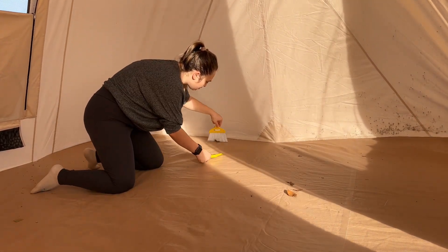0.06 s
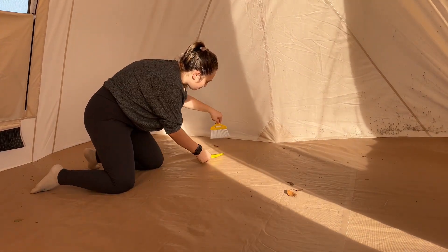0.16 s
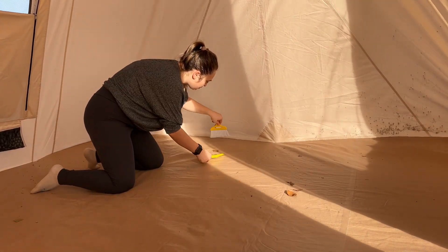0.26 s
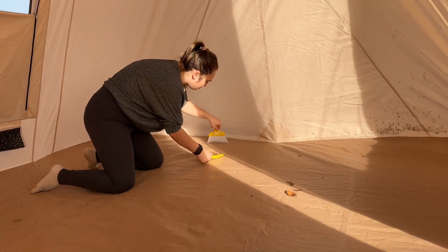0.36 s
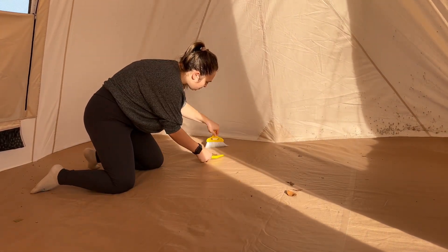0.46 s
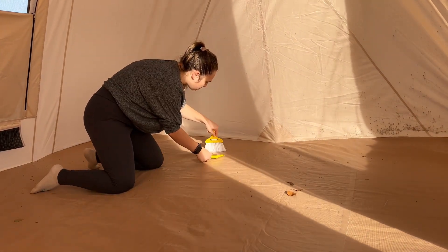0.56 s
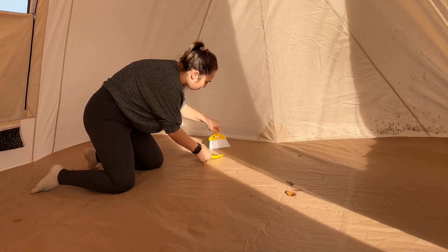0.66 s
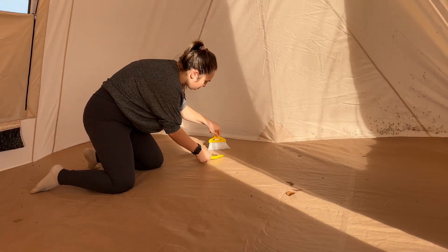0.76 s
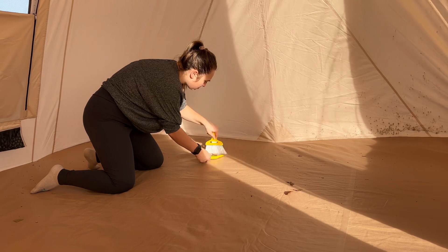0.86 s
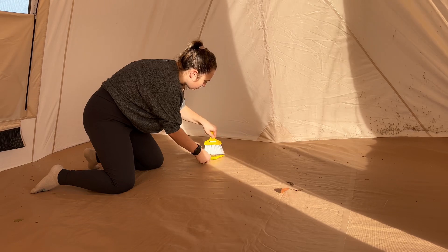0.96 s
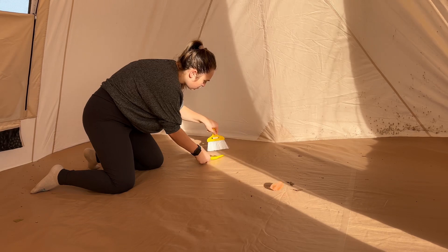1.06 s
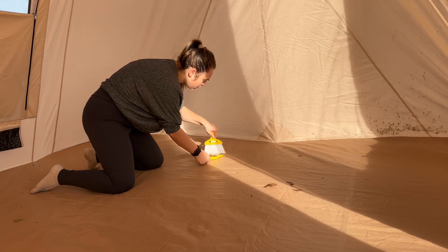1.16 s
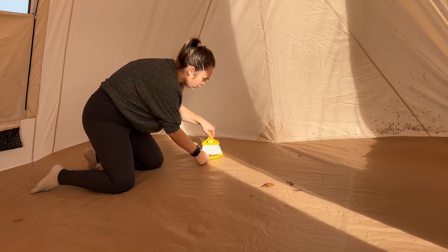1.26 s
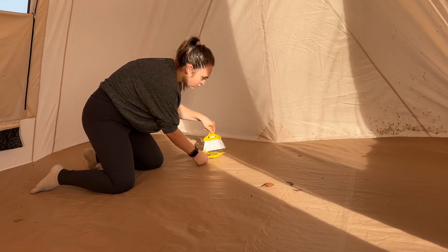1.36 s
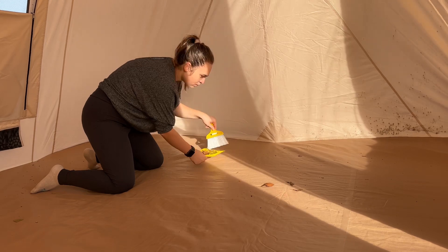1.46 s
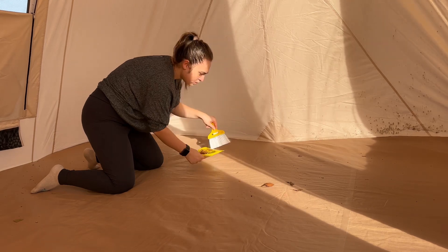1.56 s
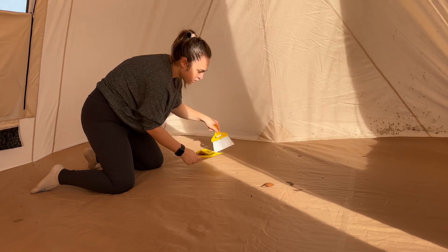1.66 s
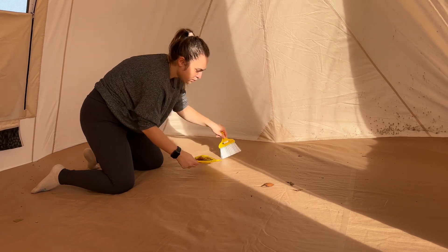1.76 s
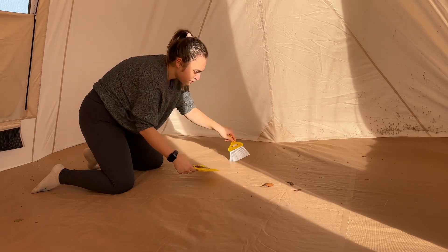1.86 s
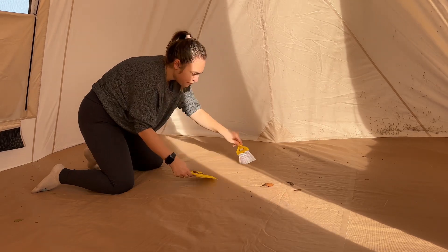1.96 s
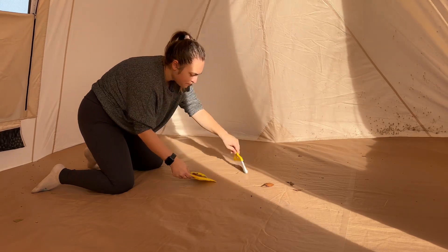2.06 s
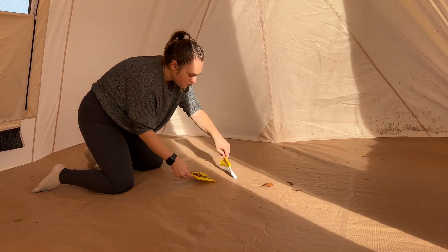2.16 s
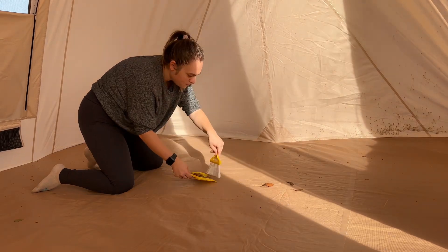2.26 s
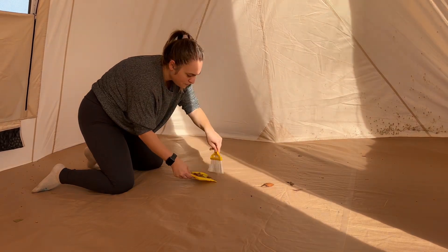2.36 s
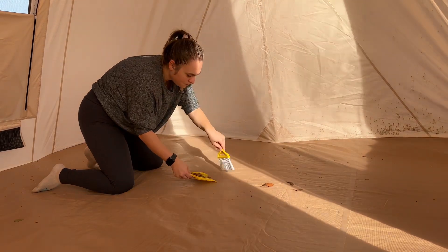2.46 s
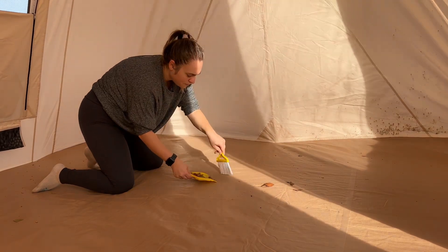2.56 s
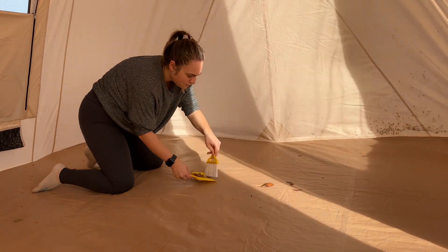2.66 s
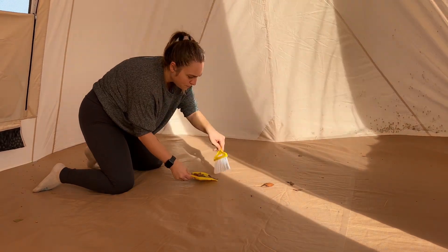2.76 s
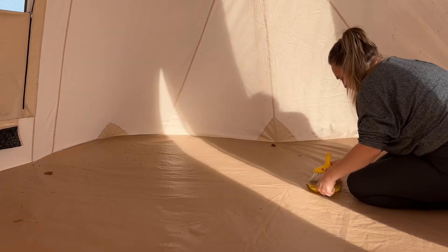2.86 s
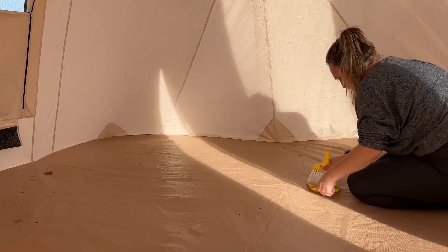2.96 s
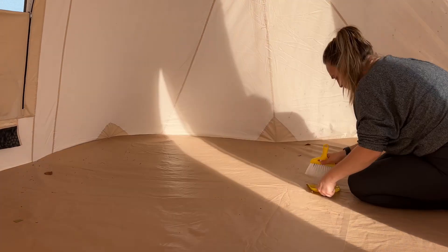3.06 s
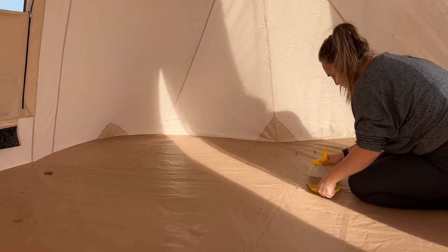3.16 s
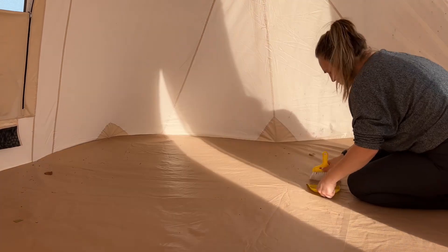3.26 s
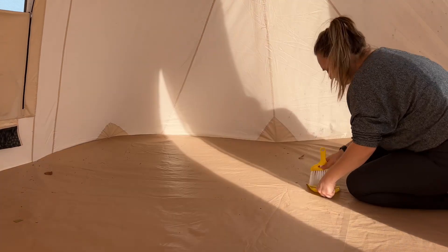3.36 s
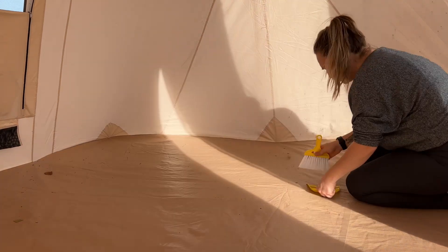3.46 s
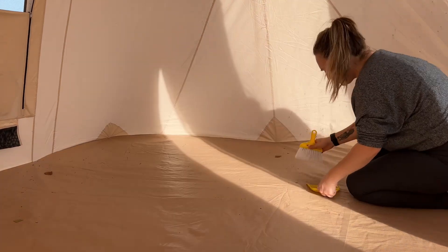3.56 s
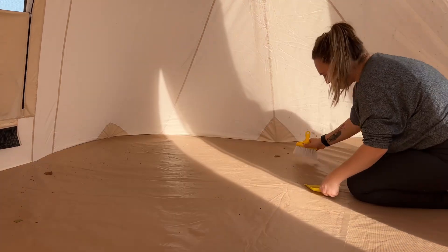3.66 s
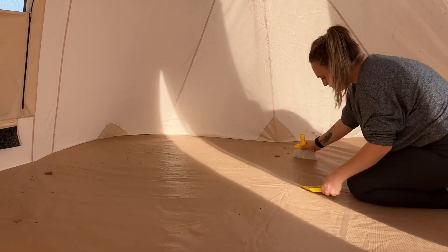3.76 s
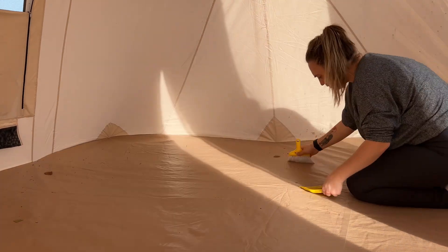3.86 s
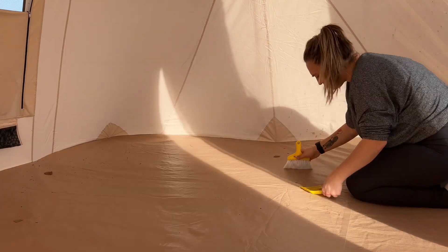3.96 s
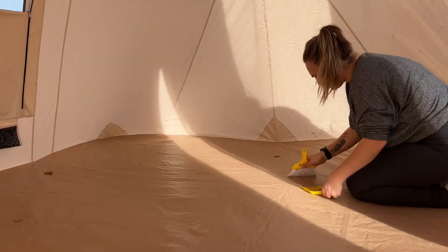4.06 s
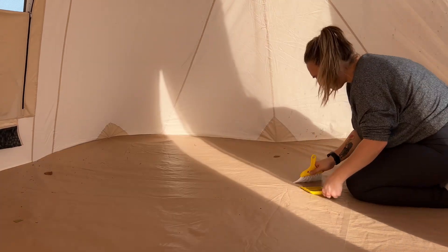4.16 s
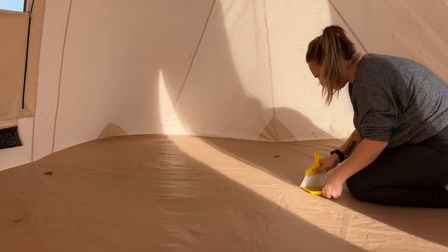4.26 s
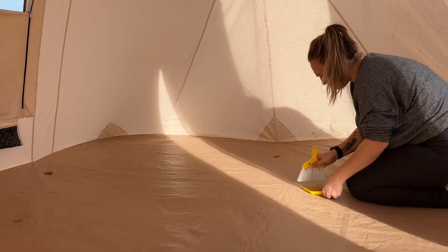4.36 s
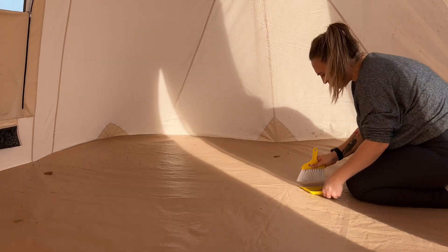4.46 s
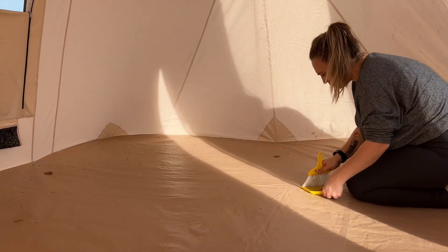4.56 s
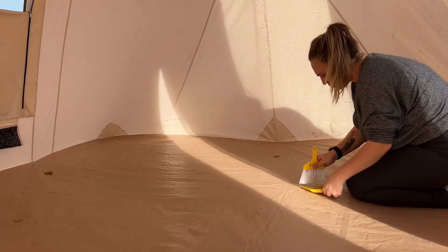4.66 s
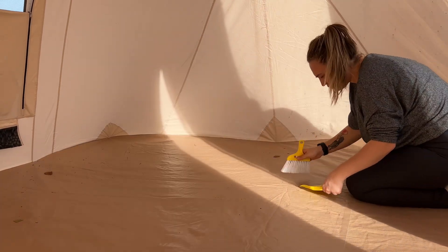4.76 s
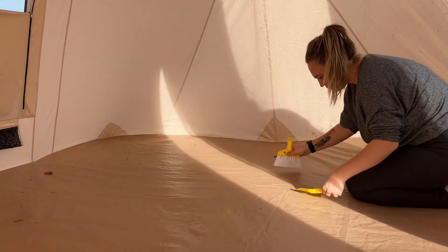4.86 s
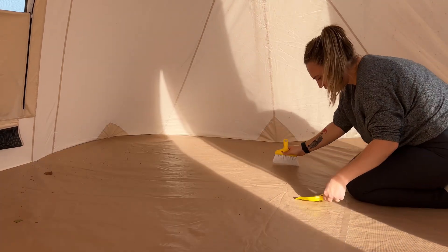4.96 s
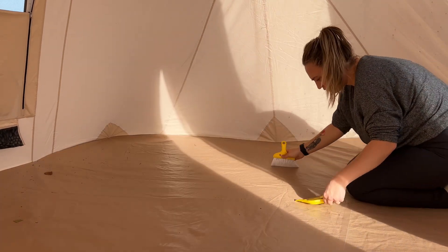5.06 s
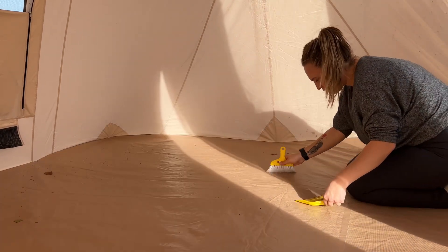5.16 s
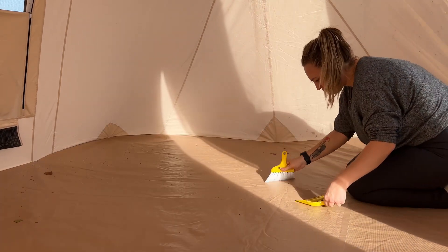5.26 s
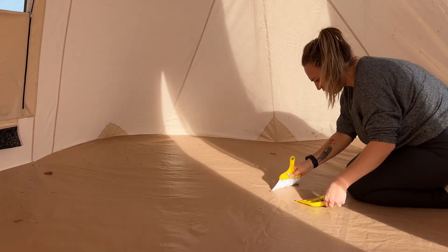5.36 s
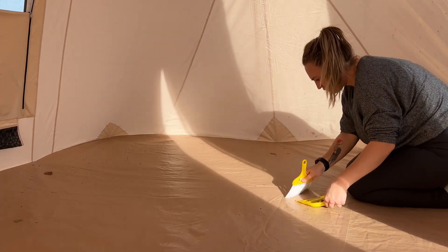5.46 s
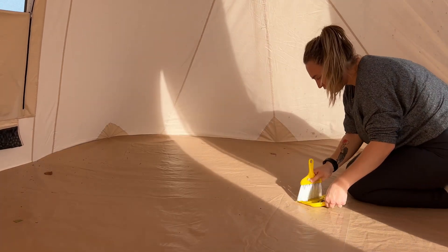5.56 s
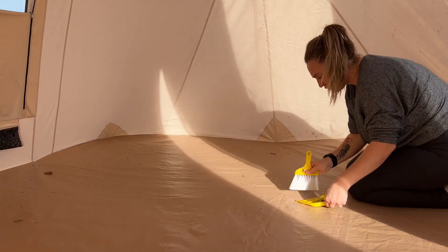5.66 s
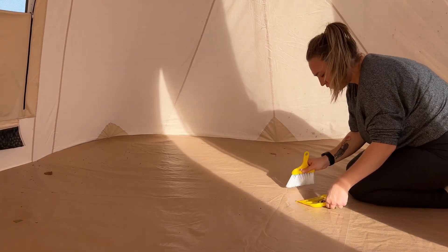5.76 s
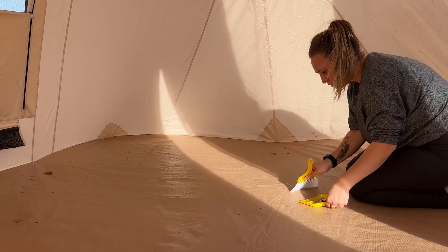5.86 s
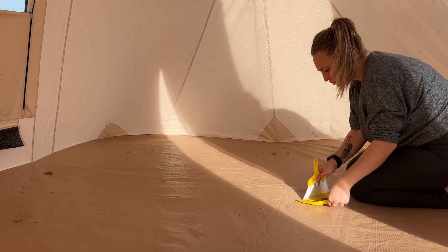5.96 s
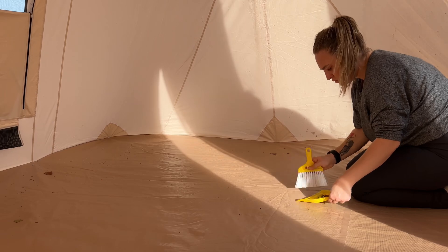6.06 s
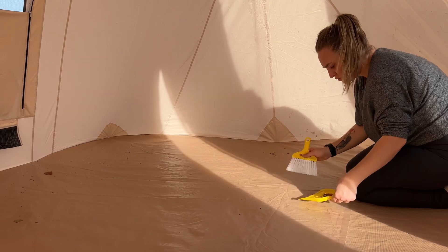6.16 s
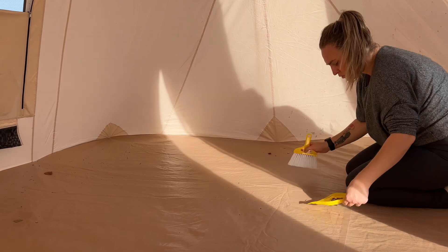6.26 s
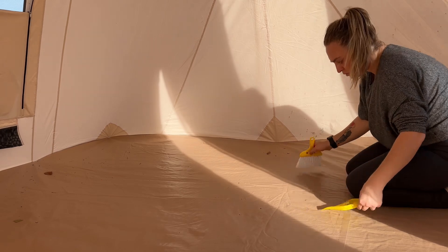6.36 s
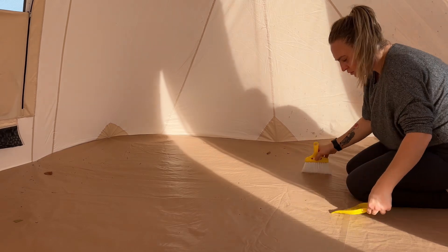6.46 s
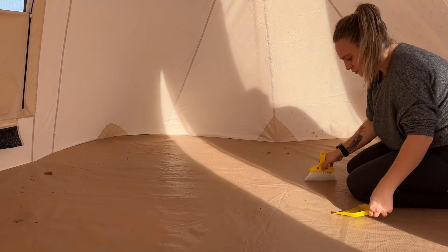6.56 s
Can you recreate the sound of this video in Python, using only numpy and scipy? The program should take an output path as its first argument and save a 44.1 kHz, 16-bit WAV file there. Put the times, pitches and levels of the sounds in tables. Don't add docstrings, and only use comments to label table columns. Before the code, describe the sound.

Inside a cloth tent, a small stiff brush sweeps a slack canvas floor in short, uneven strokes: fizzy bristles, a papery scrape and a hollow flutter of fabric. Early strokes come with faint cloth creaks and small ticks. A low knee thump precedes an abrupt scene change, then brisker sweeping brings firm hollow knocks and plastic pan clicks. One fairly close microphone, mono, with soft outdoor hum and short diffuse echoes.

```python
import sys
import numpy as np
from scipy import signal
from scipy.io import wavfile
from scipy.ndimage import uniform_filter1d

SR = 44100
rng = np.random.default_rng(int(sys.argv[2]) if len(sys.argv) > 2 else 0)


def file_out(sig):
    cols = np.atleast_2d(sig).T
    lim = np.clip(cols, -1, 1)
    pcm = np.round(lim * 32767).astype(np.int16)
    wavfile.write(sys.argv[1], SR, pcm)


def voltage_ratio(level):
    return 10 ** (np.asarray(level, float) / 20)


N = 291501
TIME = np.arange(N) / SR
STEPS = TIME[::32]
CUT_S = 2.795


def evened(x):
    return x / np.sqrt(np.mean(x ** 2) + 1e-20)


def read(points, hz):
    f, value = np.transpose(points)
    return np.interp(np.log(hz + 1), np.log(f + 1), value)


def add(mix, s, sound):
    part = mix[round(s * SR):][:len(sound)]
    part += sound[:len(part)]


def coloured(x, points, size=4096):
    hz = np.abs(np.fft.fftfreq(size, 1 / SR))
    inside = (hz >= points[0][0]) & (hz <= points[-1][0])
    gain_db = np.where(inside, read(points, hz), -70.)
    log_gain = np.log(voltage_ratio(uniform_filter1d(gain_db, size=5, mode="wrap")))
    taps = np.fft.ifft(np.exp(np.conj(signal.hilbert(log_gain)))).real
    return evened(signal.oaconvolve(x, taps)[:N])


def resonate(x, hz, width):
    turn = np.exp(2j * np.pi * np.cumsum(hz * np.ones(len(x))) / SR)
    r = np.exp(-np.pi * width / SR)
    smooth = signal.lfilter([1 - r], [1, -r], x / turn)
    return 2 * (turn * smooth).real


def wander(per_s):
    return evened(signal.lfilter(*signal.butter(2, per_s, fs=SR), rng.standard_normal(N)))


def patchy(x, depth_db, hz, seconds, size=512):
    bins_hz, _, z = signal.stft(x, SR, nperseg=size, noverlap=size * 3 // 4)
    depth_db = depth_db * np.minimum(bins_hz / 600, 1)[:, None]
    field = rng.standard_normal(z.shape)
    for axis, length in enumerate([hz * size / SR, seconds * 4 * SR / size]):
        for _ in range(2):
            field = uniform_filter1d(field, max(round(length), 1), axis)
    z = z * voltage_ratio(depth_db * evened(field))
    return evened(signal.istft(z, nperseg=size, noverlap=size * 3 // 4)[1][:N])


def hum():
    # pitch in Hz, level in dB per Hz.
    hum_colour = [(13, -16), (22, 3.5), (48, 3), (139, 0.5), (274, -3), (434, -2), (569, -6), (706, -9),
                  (854, -11), (1820, -17.5), (2330, -22), (13200, -36), (14300, -55)]
    # time in seconds, level in dB.
    loudness = [(0.0, -45.5), (.13, -47.5), (2.4, -49), (3.8, -47), (4.6, -47.5), (5.04, -48), (6.26, -45),
                (6.61, -49)]
    # pitch in Hz, width in Hz, dB in the first view, dB in the second view.
    drones = [(136.4, 19, -58, -57), (297, 66, -66.5, -49.5)]
    s, db = np.transpose(loudness)
    wash = coloured(rng.standard_normal(N), hum_colour, size=16384)
    wash = patchy(wash, 2.9, 300, .035, size=1024)
    out = voltage_ratio(np.interp(TIME, s, db) + 1.5) * wash
    for hz, width, first_db, second_db in drones:
        drone = evened(resonate(rng.standard_normal(N), hz * (1 + 0.11 * wander(3.0)), width))
        out += voltage_ratio(np.where(TIME < CUT_S, first_db, second_db) + 1.2 * wander(6.3)) * drone
    return out


def shape(touch, rise, hold, lift=0.97, trail_db=-13.5):
    u = np.clip((STEPS - touch) / rise, 0, 1)
    held = np.clip(STEPS - touch - rise, 0, hold)
    after = np.maximum(STEPS - touch - rise - hold, 0)
    lifting_db = -lift * 346 * after
    trailing_db = trail_db - 107 * after
    release = voltage_ratio(lifting_db) ** 2 + voltage_ratio(trailing_db) ** 2
    speed_db = -16 * (1 - u) ** 1.27 - 1.5 * held
    return np.minimum(3 * u, 1) * voltage_ratio(speed_db) ** 2 * release


def movements():
    # touch in seconds, speeding up in seconds, full speed in seconds,
    # speed in dB, pressure in dB.
    strokes = [(0.0, 0.0017, 0.057, -32, -5), (.288, .005, 0.044, -42.5, -12),
               (.31, 0.12, 0.13, -30.5, -3.5), (0.702, 0.15, 0.053, -29.5, -1.5),
               (1.132, 0.06, .006, -29, 2), (1.72, 0.13, 0.054, -35.5, 1.5), (1.88, 0.044, 0.1, -40, 9),
               (2.018, .2, .03, -28, 2), (2.5, 0.027, .02, -56, 11), (2.54, 0.066, 0.0085, -29.5, -1),
               (2.795, 0.024, 0.11, -32, 3.5), (3.191, 0.12, 0.0061, -26.5, -0.5),
               (3.75, 0.16, 0.293, -32, 4), (4.2, 0.04, .012, -32.5, 2.5), (4.48, 0.094, .006, -32.5, 3),
               (4.905, .006, 0.067, -52, 0), (5.018, 0.15, .3, -31, 2), (5.38, 0.092, 0.067, -29.5, 2),
               (5.812, 0.13, 0.0044, -30.5, 1.5), (6.203, .004, 0.045, -45.5, -22),
               (6.401, 0.17, .1, -31, 3)]
    # start in seconds, length in seconds,
    # push on the canvas in dB, grind in dB.
    scrubs = [(0.286, 0.016, -46, -47.5), (0.659, 0.071, -43.5, -53.5), (1.133, 0.034, -41, -49),
              (1.436, 0.064, -52.5, -60), (1.597, 0.14, -55, -62), (1.733, 0.085, -41.5, -57),
              (3.159, 0.022, -35.5, -46.5), (3.452, 0.14, -51, -59), (3.646, .14, -42, -47.5),
              (4.472, 0.019, -36.5, -43), (4.633, 0.08, -49, -51.5), (4.9, 0.088, -40, -43.5),
              (5.791, 0.011, -37, -46.5), (6.01, 0.056, -65, -52), (6.381, 0.032, -35, -44)]
    # time in seconds, level in dB.
    shuffle = [(0.0, -55.5), (1.5, -52.5), (1.6, -60), (2.44, -69), (2.53, -56), (2.7, -70), (3.1, -58),
               (3.45, -61), (3.7, -49), (4.4, -65), (6.61, -76)]
    drum_lift, drum_trail_db = 1.52, -59
    s, db = np.transpose(shuffle)
    offsets_db = np.array([[0], [-5], [-5.5]])
    power = voltage_ratio(np.interp(STEPS, s, db) + offsets_db) ** 2
    for touch, rise, hold, speed_db, press_db in strokes:
        scrape_db = speed_db - 9.5 + 0.31 * press_db
        drum_db = speed_db - 8 + press_db
        power[0] += voltage_ratio(speed_db) ** 2 * shape(touch, rise, hold)
        power[1] += voltage_ratio(scrape_db) ** 2 * shape(touch, rise, hold, 0.8)
        power[2] += voltage_ratio(drum_db) ** 2 * shape(touch, rise, hold, drum_lift, drum_trail_db)
    for touch, hold, push_db, grind_db in scrubs:
        gains = voltage_ratio(np.array([[grind_db - 6], [grind_db], [push_db]]))
        power += gains ** 2 * shape(touch, 0.0076, hold, drum_lift, drum_trail_db)

    slack_hz, taut_hz, taut_db, taut_s = 545, 682, -37, 0.033
    lag = taut_s / STEPS[1]
    pull = signal.lfilter([1], [lag, 1 - lag], power[0]) / voltage_ratio(taut_db) ** 2
    canvas_hz = slack_hz + (taut_hz - slack_hz) * pull / (1 + pull)
    hand = voltage_ratio(0.61 * wander(25))
    fizz, scrape, drum = [hand * np.interp(TIME, STEPS, np.sqrt(p)) for p in power]
    return fizz, scrape, drum, np.interp(TIME, STEPS, canvas_hz)


def slips(per_s, spread_db, clump_db, clump_per_s):
    uneven_db = spread_db * np.minimum(rng.exponential(1, N), 5)
    size = voltage_ratio(uneven_db + clump_db * wander(clump_per_s))
    return size * rng.choice([-1., 1.], N) * (rng.random(N) < per_s / SR)


def brush():
    # pitch in Hz, level in dB per Hz.
    fizz_first = [(2500, -14), (4000, -26.5), (5200, -11), (7300, -5.5), (10300, -4.5), (13500, -2.5),
                  (14300, -6.5)]
    fizz_second = [(2060, -29), (3500, -9), (4180, -8), (5640, -6), (6230, -5), (13300, 2), (13900, 4),
                   (14300, -24)]
    scrape_colour = [(600, -59), (950, 4), (1400, 3.5), (2000, 2.5), (2600, 0), (3300, 1), (4600, -1.5),
                     (6000, -6), (8500, -22)]
    # factor on the canvas pitch, width in Hz, level in dB.
    canvas = [(.58, 149, -17.5), (.8, 160, -3.5), (1.0, 170, 5), (1.24, 202, -0.5), (1.55, 300, -5),
              (1.95, 300, -20)]
    fizz_gain, scrape_gain, drum_gain, canvas_hz = movements()
    tips = slips(14000, 0.83, 0.52, 40)
    fizz = np.where(TIME < CUT_S, coloured(tips, fizz_first), coloured(tips, fizz_second))
    rough = evened(tips) + 1.47 * evened(slips(4000, 1.6, 0.51, 97))
    scrape = coloured(rough, scrape_colour)

    canvas_hz = canvas_hz * (1 + .07 * wander(14))
    pushes = slips(1800, 1.2, 0.89, 37)
    drum = np.zeros(N)
    for factor, width, db in canvas:
        ring = resonate(resonate(pushes, factor * canvas_hz, width), factor * canvas_hz, 2 * width)
        drum += voltage_ratio(db) * ring / np.sqrt(width)

    fizz = patchy(fizz, 1.28, 700, 0.072)
    scrape = patchy(scrape, 1.63, 300, 0.022)
    return fizz_gain * fizz + scrape_gain * scrape + drum_gain * evened(drum)


def creaks():
    # start in seconds, length in seconds, level in dB, pitch in Hz, width in Hz.
    creak_list = [
        (0.122, .056, -47, 1180, 250),
        (0.203, 0.22, -45, 1160, 130),
        (0.302, 0.076, -52, 1280, 220),
        (1.305, 0.077, -46.5, 1087, 120),
        (1.457, .085, -50, 886, 50),
        (1.6, 0.06, -55, 1180, 50),
    ]
    out = np.zeros(N)
    chance = rng.standard_normal((len(creak_list), SR // 4))
    for (s, length, db, hz, width), hiss in zip(creak_list, chance):
        hiss = hiss[:round(length * SR)]
        hz = hz * (1 + 0.041 * np.linspace(-1, 1, len(hiss)))
        whistle = evened(resonate(resonate(hiss, hz, width), hz, width))
        add(out, s, voltage_ratio(db) * whistle * np.hanning(len(hiss)))
    return out


def ticks():
    # start in seconds, level in dB, centre in Hz.
    grit = [(.148, -42, 9000), (.197, -40, 10000), (.222, -38.5, 7500), (.242, -37.5, 9500),
            (.284, -37, 11000), (2.787, -33, 8200), (3.115, -43, 11500), (3.1773, -35, 3600),
            (3.435, -38, 7000), (3.522, -33.5, 10600), (3.601, -46, 4500), (3.640, -43, 5500),
            (3.641, -45, 11000), (3.653, -31, 3440), (4.79, -44, 3100), (4.862, -38, 3000),
            (4.863, -41, 9000), (4.9051, -32.5, 3460), (6.03, -40, 3000), (6.039, -37, 2200),
            (6.2049, -29, 10500)]
    # start in seconds, level in dB, centre in Hz, time to fall 60 dB in seconds.
    pan = [(1.0, -35.5, 2360, 0.0097), (1.277, -41, 2750, 0.038), (2.611, -29.5, 2200, 0.05),
           (2.617, -38, 2000, .03), (2.623, -35.5, 1690, 0.083), (3.499, -55, 13500, .036),
           (4.918, -37, 7700, .02), (4.918, -26, 12500, .02), (5.798, -42, 2920, .032),
           (6.2085, -25, 10430, 0.011), (6.208, -26.5, 5450, 0.02), (6.2085, -33, 1900, 0.021),
           (6.212, -47.5, 1950, 0.25)]
    out, t = np.zeros(N), np.arange(7000) / SR
    rows = [(s, db, hz, 2800 + 0.3 * hz, .015) for s, db, hz in grit]
    rows += [(s, db, hz, 640 + 0.088 * hz, t60) for s, db, hz, t60 in pan]
    chance = rng.standard_normal((len(rows), len(t)))
    for (s, db, hz, width, t60), hiss in zip(rows, chance):
        puff = resonate(resonate(hiss, hz, width), hz, width)
        add(out, s, evened(puff) * voltage_ratio(db - 60 * t / t60))
    return out


def knocks():
    # start in seconds, level in dB, pitch in Hz, time to fall 60 dB in seconds, hardness in dB.
    blows = [(.291, -24, 480, .035, 2), (.712, -32, 514, .031, 4), (1.132, -32, 556, .036, 3),
             (1.720, -39, 606, .035, 3), (3.1553, -19, 430, .02, -3), (3.1579, -7, 505, .032, -8),
             (3.1695, -21, 645, .016, -2), (3.180, -28, 640, .053, 2), (3.704, -22, 540, .04, -5),
             (3.7635, -17, 520, .035, -4), (4.479, -15, 560, .045, -3), (4.9047, -21.5, 596, .018, 5),
             (4.946, -26, 687, .067, -1), (5.7941, -8, 500, .024, -4), (5.7978, -3, 630, .019, -5),
             (5.806, -22, 620, .05, -4), (6.382, -24, 520, .045, 0), (6.418, -29, 730, .03, 1),
             (6.463, -23, 513, .036, 2)]
    # factor on pitch, level in dB, share of hardness.
    modes = [(.4, -27, 0.069), (.65, -17, 1.5), (1.0, -8, 1.9), (1.19, -5, 0.18), (1.5, -10, 0),
             (2.3, -22, 1.2), (3.1, -24, 1.4)]
    out, t = np.zeros(N), np.arange(5000) / SR
    for s, db, hz, t60, hard_db in blows:
        rise = .0014 * voltage_ratio(-.95 * hard_db)
        ring = np.zeros(len(t))
        for factor, mode_db, share in modes:
            ring += voltage_ratio(mode_db + share * hard_db) * np.sin(2 * np.pi * factor * hz * t)
        add(out, s, voltage_ratio(db - 60 * t / t60) * (1 - np.exp(-t / rise)) * ring)
    return out


def thump():
    # time in seconds, level in dB.
    settling = [
        (2.72, -46),
        (2.744, -39),
        (2.775, -33.5),
        (2.788, -30),
        (2.8, -74),
    ]
    s, db = np.transpose(settling)
    wobble = evened(resonate(resonate(rng.standard_normal(N), 105, 70), 100, 90))
    return voltage_ratio(np.interp(TIME, s, db, left=-99, right=-99)) * wobble


def tent(x):
    # pitch in Hz, time to fall 60 dB in seconds.
    fading = [(300, 0.39), (1500, 0.3), (6000, 0.61), (14000, 0.37)]
    taps = np.zeros(SR // 2)
    at = np.arange(240, len(taps) - 20, 20)
    taps[at + rng.integers(0, 20, len(at))] = rng.choice([-1., 1.], len(at))
    hz, t, z = signal.stft(taps, SR, nperseg=256)
    fade = voltage_ratio(-60 * t / read(fading, hz)[:, None])
    tail = signal.istft(z * fade, SR, nperseg=256)[1]
    return signal.fftconvolve(x, tail / np.linalg.norm(tail))[:N]


def scene():
    hits = knocks() + ticks()
    sweep = brush() + creaks()
    echoes = tent(voltage_ratio(-7) * hits + voltage_ratio(-13.5) * sweep)
    mono = hits + sweep + echoes + thump() + hum()
    dip_db = -10 * np.exp(-((TIME - CUT_S - .003) / .006) ** 2)
    mono = mono * voltage_ratio(dip_db)
    return np.array([mono, mono])


def roll_off(x):
    return signal.sosfilt(signal.butter(12, 15390, fs=SR, output="sos"), x)


def record(dry):
    low_pass = signal.firwin(401, 14150, window=("kaiser", 9), fs=SR)
    limited = signal.oaconvolve(dry, low_pass[None], "same")
    return roll_off(limited)


dry = scene()
out = record(dry)
file_out(out)
```